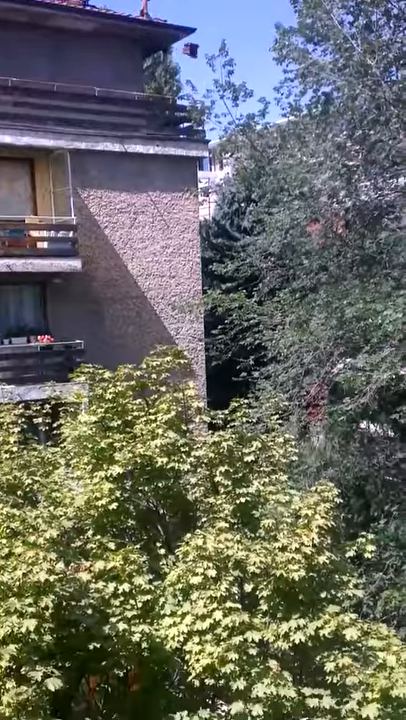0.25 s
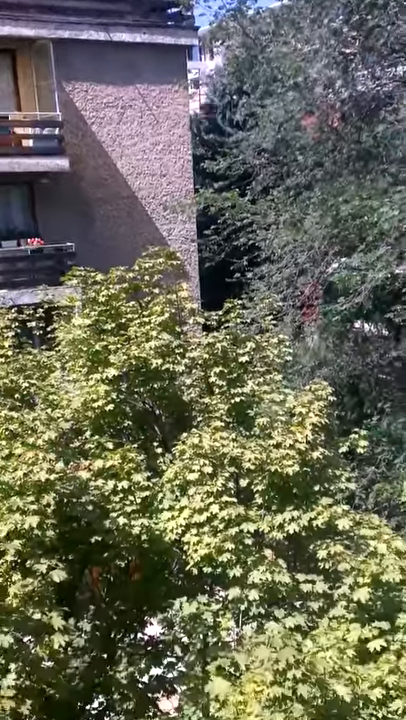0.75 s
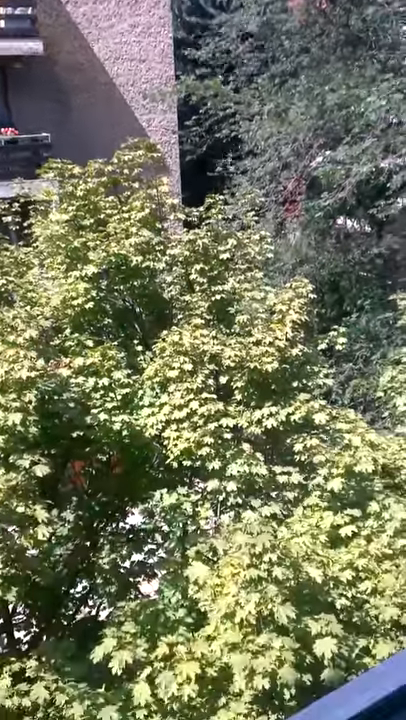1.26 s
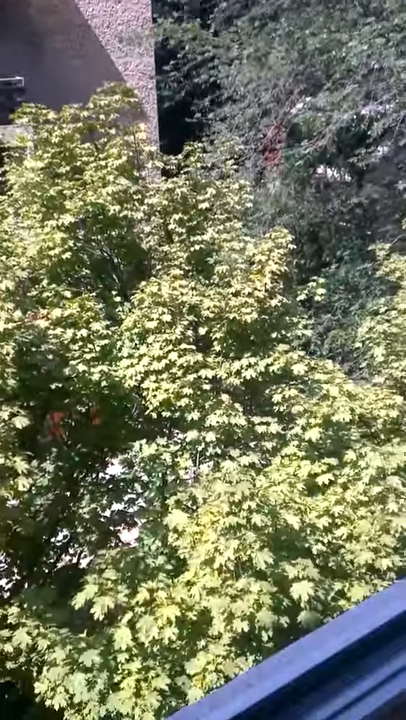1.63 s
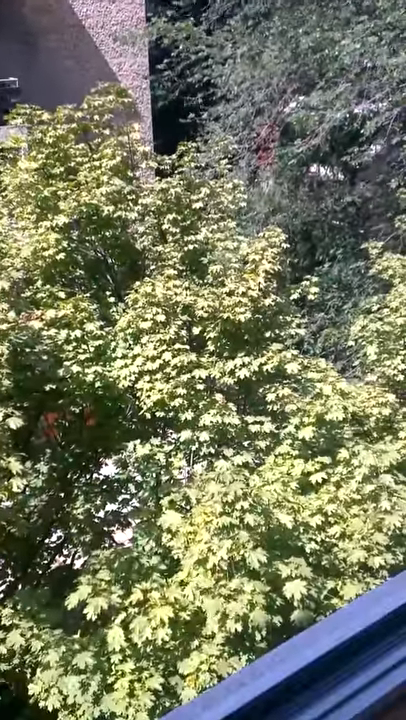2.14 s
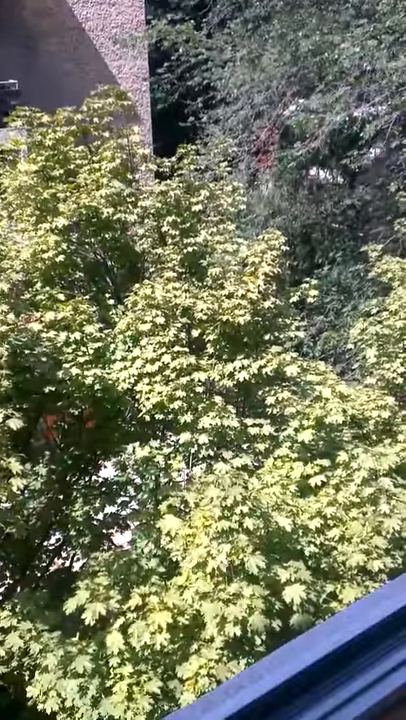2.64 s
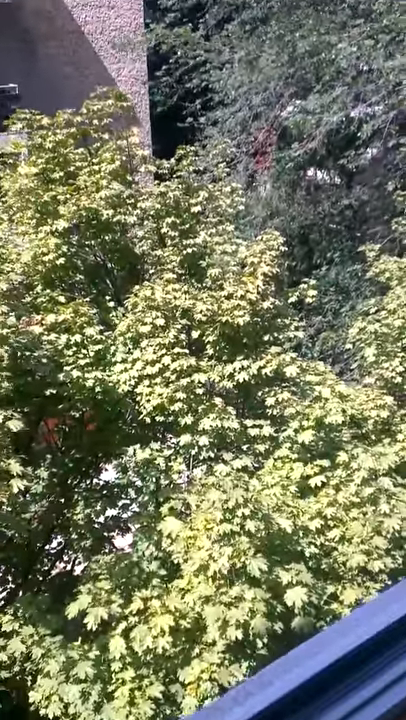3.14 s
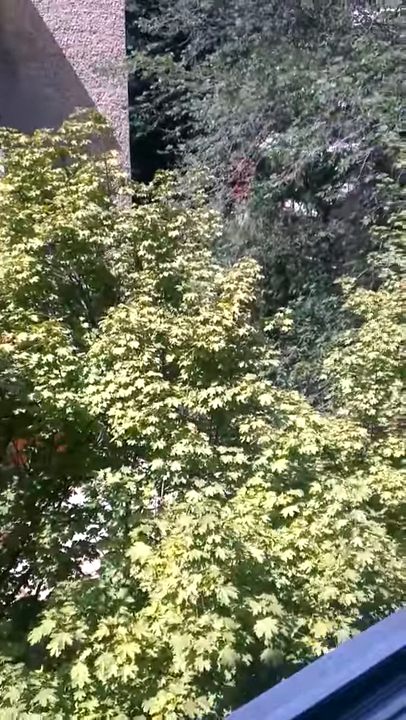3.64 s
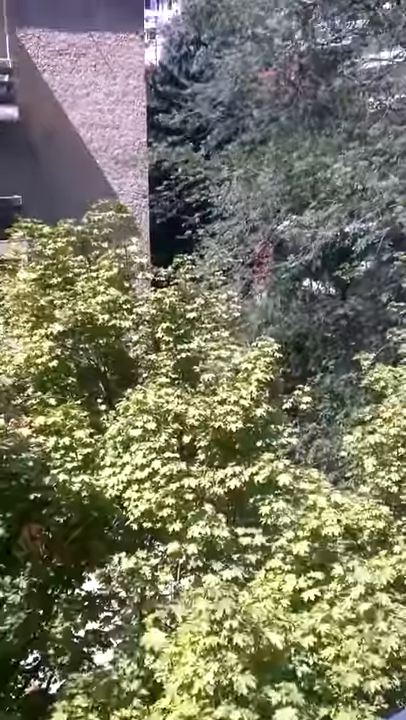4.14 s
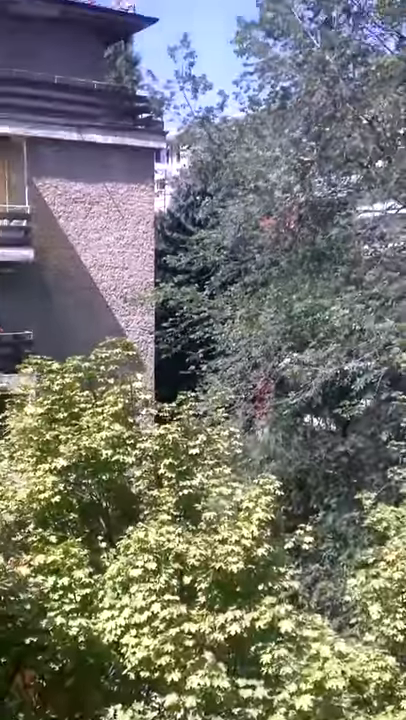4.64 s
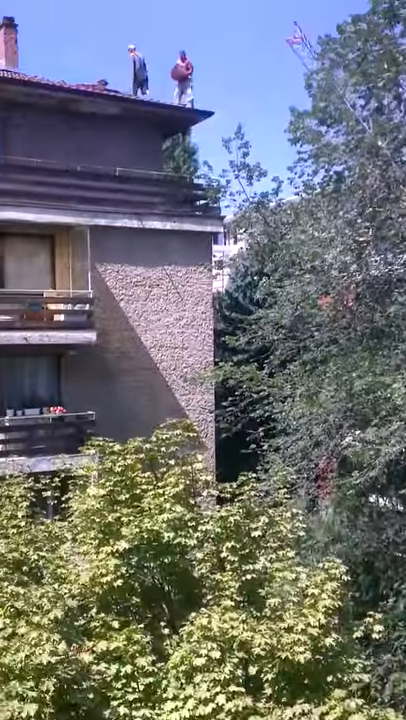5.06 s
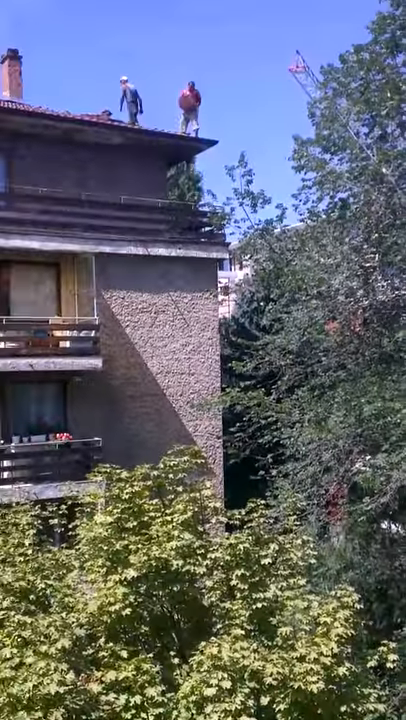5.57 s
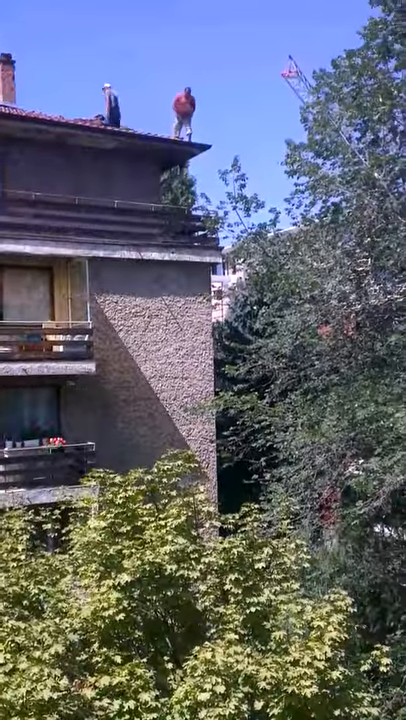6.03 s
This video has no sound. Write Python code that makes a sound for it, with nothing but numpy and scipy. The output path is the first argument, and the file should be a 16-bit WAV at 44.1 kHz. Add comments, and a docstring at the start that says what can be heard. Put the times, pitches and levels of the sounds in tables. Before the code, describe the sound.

Clay tiles knock and slide down a hollow chute, smash loudly onto a rubble heap, then shards shower, clink and settle in a quiet yard.

```python
"""Roof tiles down a rubble chute

Tiles slide and knock in a hollow chute, as noise trains through resonances, then smash on the heap in a skip.
Shards ring as short decaying sines; a late piece drops and clinks, and grit patters in bursts of tiny ticks.
Noise tails make the walls of a quiet yard answer, with a far bird and faint low tone over shaped-noise air.
The camera widens the stereo with a delayed copy and overloads on the big smash."""
import sys
import numpy as np
from scipy import signal
from scipy.fft import rfft, irfft, next_fast_len
from scipy.io import wavfile
from scipy.ndimage import map_coordinates

SR = 44100
rng = np.random.default_rng(int(sys.argv[2]) if len(sys.argv) > 2 else 0)


def dump_mix(stems):
    """Bounce the given channels to the path in sys.argv[1] as a 16-bit WAV at rate SR."""
    frames = np.atleast_2d(stems).T  # one column per channel
    limited = np.clip(frames, -1, 1)  # hard clip at full scale
    pcm = np.round(limited * 32767).astype(np.int16)
    wavfile.write(sys.argv[1], SR, pcm)


N = 277609

# Levels are relative: each layer has its own mix gain.
# Distant town and leaves: [f/Hz, level/dB]
AIR_SPECTRUM = [(18, -94.5), (30, -56.5), (64, -55.5), (117, -19.5), (192, -14.5), (263, -5), (379, -5),
                (410, -11.5), (709, -4), (874, -8.5), (1140, -13.5), (1260, -16), (4780, -26), (12300, -27),
                (15500, -38)]
# Far twitter: [t/s, centre f/Hz, level/dB]
BIRD_NOTES = [(6.06, 4700, -65), (6.14, 4200, -55), (6.21, 3700, -57.5), (6.29, 3900, -56)]
# Yard decay: [f/Hz, t60/s]
YARD_DECAY = [(150, 0.57), (700, 0.59), (1500, 0.6), (4000, .95), (9000, 0.9), (14000, 0.12)]
# Unshared part of the two ports: [f/Hz, side re mid/dB]
PORT_SIDE = [(100, -10), (700, -19), (3000, -10.5), (9000, -5.5), (14000, -3.5)]
# Delayed copy that widens the stereo: [f/Hz, level/dB]
WIDENING = [(300, -5.5), (1500, -6.5), (5000, -8), (9000, -14), (13000, -28.5)]
# Handfuls of grit: [t/s, level/dB, t60/s]
GRIT_HANDFULS = [(0.605, -40.5, 0.15), (0.750, -28, 0.25), (0.896, -31.5, 0.3), (0.975, -22, 0.2),
                 (1.167, -31, 0.27), (3.707, -37, 0.25), (3.767, -41.5, 0.28), (4.0126, -30, 0.14),
                 (4.0776, -25.5, 0.109), (4.386, -33, 0.057), (4.401, -33.5, 0.098), (4.4377, -25, 0.053),
                 (4.686, -38.5, 0.1033), (4.811, -45.5, 0.11), (6.006, -48, 0.0797)]
# Fine grit ticks: [f/Hz, level/dB]
TICK_SPECTRUM = [(2000, -50), (5000, -1), (6300, 2), (7500, 1), (9200, 2.5), (11000, -7.5), (13000, -14.5),
                 (15000, -24)]
# Larger chips: [f/Hz, width/Hz, level/dB]
COARSE_MODES = [(3050, 920, -3), (4620, 1900, -3)]
# Small piece chattering: [t/s, level/dB]
CLINK_TIMES = [(2.8164, -28.5), (2.822, -42.5), (3.1768, -34.5)]
# Ring of that piece: [f/Hz, width/Hz, level/dB]
CHIP_MODES = [(8400, 90, -14), (8750, 130, 0), (9990, 120, -6), (11630, 170, -6)]
# Stray landings: [t/s, clack level/dB, thud level/dB]
STRAY_DROPS = [(2.535, -36, -59), (2.804, -42, -56), (2.816, -21, -49), (2.822, -26, -56),
               (3.165, -37, -73), (4.014, -33, -52), (4.41, -40.5, -42.5), (4.809, -42.5, -54),
               (5.611, -44, -67.5)]
# Stray piece: [f/Hz, width/Hz, level/dB]
PIECE_MODES = [(722.4, 55.6, 8), (1170, 440, -6), (1570, 300, -9.5), (1950, 220, -7), (2940, 830, -11.5),
               (3270, 230, -22.5), (3780, 210, -18), (5100, 3100, -29)]
# Knocks in the chute: [t/s, level/dB, hard contact re knock/dB]
CHUTE_KNOCKS = [(0.491, -26.5, -2), (0.634, -38, -19), (0.753, -28, -3.5), (0.874, -15, -10),
                (0.981, -20, -1), (1.016, -4.5, -7), (1.404, -10.5, -5), (1.605, -15, -13)]
# Rumble of the sliding load: [t/s, level/dB]
SLIDE_LEVEL = [(0.0, -45.5), (0.42, -60), (1.03, -25), (1.63, -33.5)]
# Air in the chute: [f/Hz, width/Hz, level/dB]
HOLLOW_MODES = [(574, 24, -12.5), (640, 63, -1.5), (759.5, 22, 1.5), (863, 79, -11.5)]
# Chute wall: [f/Hz, width/Hz, level/dB]
WALL_MODES = [(1070, 200, 0), (1374, 82, 0.5), (1490, 46, 3), (1702, 180, -3.5), (2071, 150, -6),
              (2415, 150, -7.5), (3000, 88, -15.5), (4160, 280, -28)]
# Tiles smashing on the heap: [t/s, level/dB, crumbling time/s]
HEAP_SMASHES = [(1.648, 6, 0.025), (1.783, -4.5, .018), (1.879, -13, .008), (1.9, -5, .02),
                (1.947, -7, 0.025), (1.989, -10, .004), (2.12, -15, .006), (2.185, -10.5, 0.023)]
# Clay tile: [f/Hz, width/Hz, level/dB]
TILE_MODES = [(827, 47, 5.5), (1206, 43, -3), (1684, 25, 0), (2230, 16, -9), (2306, 60, -7),
              (2700, 41, -13.5), (3110, 230, -14), (3370, 39, -12), (3700, 8, -12), (4710, 27, -10),
              (6400, 34, -24.5), (6330, 59, -23)]
# Clack of tile pieces: [f/Hz, level/dB]
CLACK_SPECTRUM = [(40, -52), (130, -29.5), (450, -16.5), (600, 3), (760, 4.5), (1000, 0.5), (1400, -1.5),
                  (2500, -3.5), (3800, -14.5), (6000, -24), (12000, -43.5)]
# Flying splinters: [f/Hz, level/dB]
SPLINTER_SPECTRUM = [(200, -56.5), (1500, -18.5), (3000, -0.5), (5000, -1.5), (7000, -2), (9000, -2),
                     (10500, -8.5), (12000, -18.5), (15000, -44)]
# Steel skip and its load: [f/Hz, width/Hz, level/dB]
SKIP_MODES = [(115.4, 25, -27), (170, 16, -12), (255, 59, -2), (313, 43, 8), (420, 110, -7)]

AIR_DB = -54
HOOT_S, HOOT_LENGTH_S, HOOT_HZ, HOOT_DB = 5.7, 0.054, 422, -54  # middle, 1/e half length, pitch, level
WIDEN_S, TOP_HZ = 0.001621, 15700  # widening delay, band limit
COARSE_DB, COARSE_GROWS, HANDFUL_T60_S = -4.5, 1.5, 0.25  # chips re ticks in a full handful; dB per dB of t60
DROP_T60_S = 0.1
KNOCK_RISE_S = 0.0025  # hard contacts
REBOUND_S, REBOUND_LOSS_DB, REBOUND_DULL_DB = 0.026, 4.5, 7  # flight, strength and hardness lost each time
SMASH_T60_S = 0.12  # after crumbling
SPLINTER_DB, SPLINTER_GROWS = -15, 1.7  # for a 0 dB smash; dB per dB of the blow
THUD_DB, THUD_GROWS = -27.5, 0.71  # same for the skip, which the heap cushions
SHOWER_START_S, SHOWER_PEAK_S, SHOWER_EBB_S, SHOWER_END_S = 1.71, 1.88, 2.148, 2.8
SHOWER_RISE_DB_PER_S, SHOWER_SAG_DB_PER_S, SHOWER_FALL_DB_PER_S = 36.5, 10.5, 44.5
SETTLE_GROWS = 1  # large pieces: dB per dB of the shower
PIECE_LOW_HZ, PIECE_HIGH_HZ = 950, 2990


def amp(db):
    """Decibels to gain."""
    return 10 ** (np.asarray(db) / 20)


def unit(x):
    """Scale to rms 1."""
    return x / np.sqrt(np.mean(x ** 2) + 1e-20)


def along(points, hz):
    """Interpolate (f/Hz, value) points on a log axis."""
    f, v = np.transpose(points)
    return np.interp(np.log(hz + 1), np.log(f + 1), v)


def curves(rows):
    """One gain per sample for each dB column, fading to silence in 20 ms outside the rows."""
    s, *cols = np.transpose(rows)
    t = np.arange(N) / SR
    inside = np.interp(t, [s[0] - 0.02, s[0], s[-1], s[-1] + 0.02], [0, 1, 1, 0])
    return [inside * amp(np.interp(t, s, c)) for c in cols]


def wobble(rate_hz):
    """Smooth random curve through rate_hz knots a second."""
    return map_coordinates(rng.standard_normal(2048), [np.arange(N) * rate_hz / SR], mode="mirror")


def filtered(x, response):
    """x times a complex response of frequency."""
    m = next_fast_len(N + SR // 4, real=True)
    return irfft(rfft(x, m) * response(np.fft.rfftfreq(m, 1 / SR)), m)[..., :N]


def coloured(x, gain, size=8192):
    """Minimum-phase filter with the given gain of frequency, keeping the power of white noise."""
    cepstrum = irfft(np.log(gain(np.fft.rfftfreq(size, 1 / SR)) + 1e-6))
    # fold the cepstrum to make the filter causal
    cepstrum[1:size // 2] *= 2
    cepstrum[size // 2 + 1:] = 0
    kernel = irfft(np.exp(rfft(cepstrum)))
    return signal.oaconvolve(x, kernel[None] / np.linalg.norm(kernel), axes=1)[:, :N]


def shaped(x, spectrum):
    """x through a smooth (f/Hz, level/dB) spectrum."""
    return coloured(x, lambda f: amp(along(spectrum, f)))


def resonate(x, modes):
    """x through (f/Hz, width/Hz, level/dB) resonances with steep skirts."""
    def gain(f):
        total = 0
        for centre, width, db in modes:
            detune = (f * f - centre * centre) / ((f + 1) * width * 2)
            total = total + amp(db) / (1 + detune ** 2 * 2)
        return total
    return coloured(x, gain)


def rattle(rate_hz, spread_db):
    """Mid and side trains of tiny random contacts, rate_hz a second on average, of rms 1."""
    hits = rng.random(N) < rate_hz / SR
    strength = amp(spread_db * rng.standard_normal(N))
    return unit(hits * strength * rng.choice([-1, 1], (2, N)))


def blows(times_s, dbs, t60s, rise_s, holds_s=0):
    """Envelope of blows that swell, hold and die away; their powers sum."""
    power, t = np.zeros(N + SR), np.arange(SR // 2) / SR
    for s, db, t60, hold in np.broadcast(times_s, dbs, t60s, holds_s):
        fall_db = 60 * np.maximum(t - hold, 0) / max(t60, 0.01)
        envelope = amp(db - fall_db) * (1 - np.exp(-t / rise_s))
        power[round(s * SR):][:len(t)] += envelope ** 2
    return np.sqrt(power[:N])


def rings(s, hz, gain, t60_s, size):
    """Mid and side sum of dying sines, each cut to size samples by a linear fade."""
    s, hz, gain, t60_s = [np.reshape(v, (-1, 1)) for v in np.broadcast_arrays(s, hz, gain, t60_s)]
    t = np.arange(size) / SR
    fade = gain * amp(-60 * t / t60_s) * (1 - t / t[-1])
    at = (s * SR).astype(int) + np.arange(size)
    out = []
    for phase in rng.random((len(s), 2)).T[:, :, None]:
        tone = fade * np.sin(2 * np.pi * (hz * t + phase))
        out.append(np.bincount(at.ravel(), tone.ravel(), N)[:N])
    return np.array(out)


def air():
    """Distant town hum and leaf hiss: shaped noise, drifting slightly in level."""
    noise = filtered(rng.standard_normal((2, N)), lambda f: amp(along(AIR_SPECTRUM, f)))
    return amp(AIR_DB + 0.29 * wobble(rate_hz=16)) * unit(noise)


def hoot():
    """Faint low tone that swells and fades: a sine under a Gaussian."""
    t = np.arange(N) / SR - HOOT_S
    return amp(HOOT_DB) * np.exp(-(t / HOOT_LENGTH_S) ** 2) * np.sin(2 * np.pi * HOOT_HZ * t)


def bird():
    """Far bird: one thin, quickly warbling tone, heard only through the yard."""
    s, hz, db = np.transpose(BIRD_NOTES)
    level, = curves(np.column_stack([s, db]))
    pitch_hz = np.interp(np.arange(N) / SR, s, hz) * (1 + 0.12 * wobble(rate_hz=260))
    return amp(-4.5) * level * np.sin(2 * np.pi * np.cumsum(pitch_hz) / SR)


def yard(x, build_s):
    """Walls and trees return a diffuse tail that builds up, then decays at a rate set by frequency."""
    hz, t, z = signal.stft(rng.standard_normal((2, SR)), SR, nperseg=256)
    decay = amp(-60 * t / along(YARD_DECAY, hz)[:, None])
    tail = signal.istft(z * decay * (1 - np.exp(-t / build_s)), SR, nperseg=256)[1]
    return signal.fftconvolve(x, tail / np.linalg.norm(tail[0]), axes=1)[:, :N]


def grit():
    """Handfuls of chips spatter: clusters of tiny bright ticks, with more large chips in the longer ones."""
    s, db, t60_s = np.transpose(GRIT_HANDFULS)
    coarse_db = COARSE_DB + COARSE_GROWS * 20 * np.log10(t60_s / HANDFUL_T60_S)
    ticks = blows(s, db, t60_s, rise_s=0.00069) * rattle(rate_hz=6400, spread_db=3.5)
    chips = blows(s, db + coarse_db, t60_s, rise_s=0.014) * rattle(rate_hz=1900, spread_db=3)
    bright = amp(-9.5) * shaped(ticks, TICK_SPECTRUM)
    return bright + amp(-2.5) * resonate(chips, COARSE_MODES) + amp(-8.5) * resonate(chips, WALL_MODES)


def clinks():
    """A small hard piece chatters against the heap and rings high."""
    s, db = np.transpose(CLINK_TIMES)
    chatter = blows(s, db, t60s=0.162, rise_s=0.0012) * rattle(rate_hz=7900, spread_db=-1.5)
    return amp(-8) * resonate(chatter, CHIP_MODES)


def strays():
    """Single pieces land without breaking: a dry clack, and a dull answer from the skip."""
    s, db, thud_db = np.transpose(STRAY_DROPS)
    clack = blows(s, db, DROP_T60_S, rise_s=0.0021) * rattle(rate_hz=7400, spread_db=2.5)
    thud = blows(s, thud_db, t60s=0.31, rise_s=0.0052) * rattle(rate_hz=1300, spread_db=3)
    return amp(-1.5) * resonate(clack, PIECE_MODES) + amp(2.5) * resonate(thud, SKIP_MODES)


def chute():
    """Tiles slide and rebound ever more softly, sounding the hollow; hard contacts ring the wall."""
    s, db, hard_db = np.transpose(CHUTE_KNOCKS)
    bounce = np.arange(5)[:, None]
    s = s + REBOUND_S * bounce
    db = db - REBOUND_LOSS_DB * bounce
    hard_db = hard_db - REBOUND_DULL_DB * bounce
    slide = curves(SLIDE_LEVEL)[0] * amp(2 * wobble(rate_hz=45))  # load catches and slips
    hollow = amp(-9) * blows(s, db, t60s=0.098, rise_s=0.0032) + amp(-2.0) * slide
    wall = amp(-6) * blows(s, db + hard_db, t60s=0.17, rise_s=KNOCK_RISE_S) + amp(-16.0) * slide
    boom = resonate(hollow * rattle(rate_hz=3500, spread_db=0.5), HOLLOW_MODES)
    return boom + resonate(wall * rattle(rate_hz=2000, spread_db=0.5), WALL_MODES)


def flow():
    """Gain of the falling fragments: swells, sags while the load lasts, then ebbs away."""
    t = np.arange(N) / SR
    rise_db = SHOWER_RISE_DB_PER_S * np.maximum(SHOWER_PEAK_S - t, 0)
    sag_db = SHOWER_SAG_DB_PER_S * (np.clip(t, SHOWER_PEAK_S, SHOWER_EBB_S) - SHOWER_PEAK_S)
    fall_db = SHOWER_FALL_DB_PER_S * np.maximum(t - SHOWER_EBB_S, 0)
    return amp(-(rise_db + sag_db + fall_db)) * (t > SHOWER_START_S) * (t < SHOWER_END_S)


def spread_starts(when):
    """One random start in each of len(when) equal slots of the shower."""
    count = len(when)
    return SHOWER_START_S + (np.arange(count) + when) / count * (SHOWER_END_S - SHOWER_START_S)


def clatter(spread_db, t60_s, count=44):
    """Larger pieces strike one by one within the shower, each with a clack and its own pitch."""
    when, pitch = rng.random((count, 2)).T
    s = spread_starts(when)
    flow_db = 20 * np.log10(flow()[(s * SR).astype(int)] + 1e-6)
    db = SETTLE_GROWS * flow_db + spread_db * rng.uniform(-1, 1, count)
    clack = blows(s, db, t60_s, rise_s=0.0006) * rattle(rate_hz=4000, spread_db=1)
    hz = PIECE_LOW_HZ * (PIECE_HIGH_HZ / PIECE_LOW_HZ) ** pitch
    ring = rings(s, hz, amp(db), t60_s=0.15, size=4000)
    return amp(-25.5) * shaped(clack, CLACK_SPECTRUM) + amp(-29) * ring


def slivers(low_hz, high_hz, t60_s, count=26):
    """Thin slivers bounce clear of the shower and tinkle on as it dies down."""
    when, pitch = rng.random((count, 2)).T
    s = spread_starts(when)
    hz = low_hz * (high_hz / low_hz) ** pitch
    return rings(s, hz, flow()[(s * SR).astype(int)], t60_s, size=14000)


def shards(low_hz, high_hz, cycles, spread_db, count, size):
    """Even shower of fragments, each with its own pitch and life; rms 1 while it falls."""
    span_s = SHOWER_END_S - SHOWER_START_S
    when, pitch, life = rng.random((count, 3)).T
    hz = low_hz * (high_hz / low_hz) ** pitch
    gain = np.sqrt(hz) * amp(spread_db * rng.standard_normal(count))
    t60_s = cycles * (0.5 + life) / hz
    fall = rings(SHOWER_START_S + when * span_s, hz, gain, t60_s, size)
    return unit(fall) * np.sqrt(span_s * SR / N)


def shower():
    """Pieces rain down: splinters fizz, chunks clatter and drum on the skip; chunks fade slowest."""
    falling = flow()
    fizz = shards(low_hz=2530, high_hz=11880, cycles=50, spread_db=-0.5, count=5000, size=700)
    chunks = shards(low_hz=570, high_hz=4650, cycles=18, spread_db=2.5, count=2200, size=1200)
    spray = amp(-28.5) * falling ** 1.35 * fizz
    rubble = amp(-34) * falling * chunks
    drum = amp(-33.5) * falling ** 1.4 * rattle(rate_hz=1300, spread_db=2.5)
    tinkle = amp(-39) * slivers(low_hz=6000, high_hz=8000, t60_s=0.5)
    chips = shaped(spray, SPLINTER_SPECTRUM) + shaped(rubble, CLACK_SPECTRUM)
    return chips + resonate(drum, SKIP_MODES) + tinkle


def halves(s, db, low_hz, high_hz, t60_s, count=7):
    """Every smash frees a few large pieces that ring at pitches of their own."""
    delay, pitch, strength = rng.random((len(s), 3, count)).transpose(1, 0, 2)
    hz = low_hz * (high_hz / low_hz) ** ((np.arange(count) + pitch) / count)
    gain = amp(db[:, None] - 2.4 * strength) * (low_hz / hz) ** 0.35
    return rings(s[:, None] + 0.0096 * delay, hz, gain, t60_s, size=5000)


def heap():
    """Each smash is a burst of fractures: tiles clack and ring, splinters fly, the skip thuds."""
    s, db, crumble_s = np.transpose(HEAP_SMASHES)
    force = blows(s, db, SMASH_T60_S, rise_s=0.0016, holds_s=crumble_s)
    clack = amp(-9.5) * shaped(force * rattle(rate_hz=4000, spread_db=3.5), CLACK_SPECTRUM)
    ring = amp(-14) * resonate(force * rattle(rate_hz=4000, spread_db=2), TILE_MODES)
    ring += amp(-21) * halves(s, db, low_hz=880, high_hz=6000, t60_s=0.15)
    spray = blows(s, SPLINTER_DB + SPLINTER_GROWS * db, t60s=0.17, rise_s=0.0017, holds_s=0.78 * crumble_s)
    spray = spray * rattle(rate_hz=6000, spread_db=1.0)
    thud = blows(s, THUD_DB + THUD_GROWS * db, t60s=0.13, rise_s=0.0029, holds_s=crumble_s)
    thud = thud * rattle(rate_hz=2100, spread_db=0.0)
    return clack + ring + shaped(spray, SPLINTER_SPECTRUM) + resonate(thud, SKIP_MODES)


def ports(pair):
    """Mid and side to left and right; the camera adds a delayed mid to one and takes it from the other."""
    mid, side = pair
    side = filtered(side, lambda f: amp(along(PORT_SIDE, f)))
    side += filtered(mid, lambda f: amp(along(WIDENING, f)) * np.exp(-2j * np.pi * f * WIDEN_S))
    return np.array([mid + side, mid - side])


def scene():
    """All the falling rubble in the yard, over the still air."""
    tumble, late, spatter, chime = chute(), strays(), grit(), clinks()
    crash = heap() + shower() + clatter(spread_db=5.5, t60_s=0.045)
    send = amp(-6) * tumble + amp(-18.5) * crash + amp(-4.5) * late
    send = send + amp(-8.5) * spatter + amp(-6.0) * chime + bird()
    echo = yard(send, build_s=0.007)
    return ports(tumble + crash + late + spatter + chime + hoot() + echo + air())


def record(dry, knee_db=-17, memory_s=0.26):
    """Gain control ducks after a loud burst, too late to keep its peaks from flattening; then band limit."""
    keep = np.exp(-1 / (memory_s * SR))
    power = signal.lfilter([1 - keep], [1, -keep], np.mean(dry ** 2, axis=0))
    ducked = dry / (1 + (power / amp(knee_db + 6) ** 2) ** 2) ** (1 / 6)  # tends to 3:1
    clipped = ducked / (1 + np.abs(ducked) ** 8) ** (1 / 8)
    return filtered(clipped, lambda f: f < TOP_HZ)


dry = scene()
out = record(dry)
dump_mix(out)
```